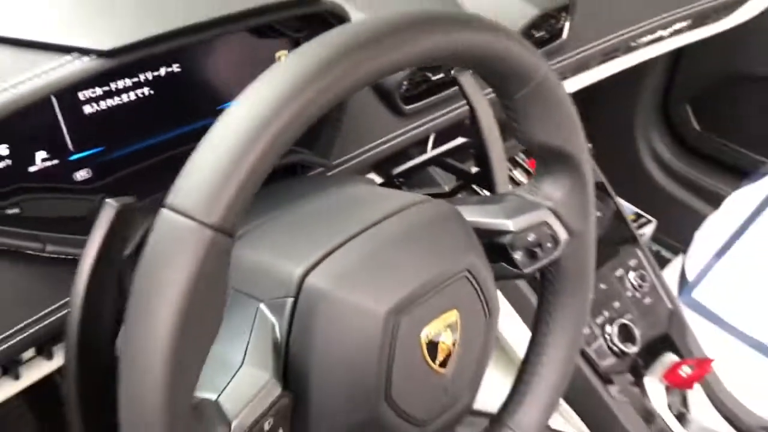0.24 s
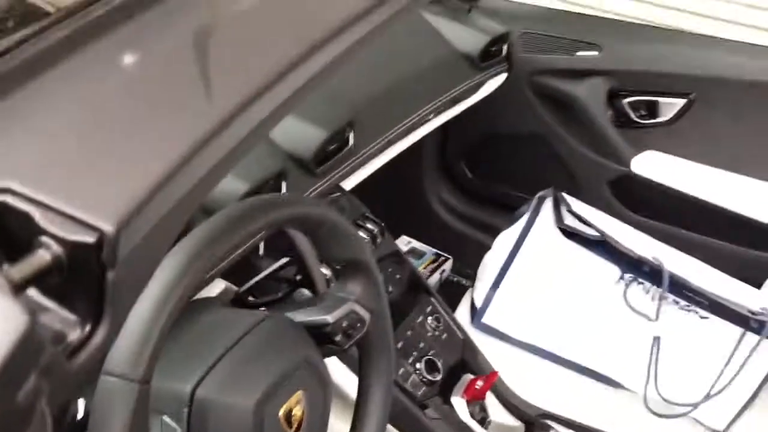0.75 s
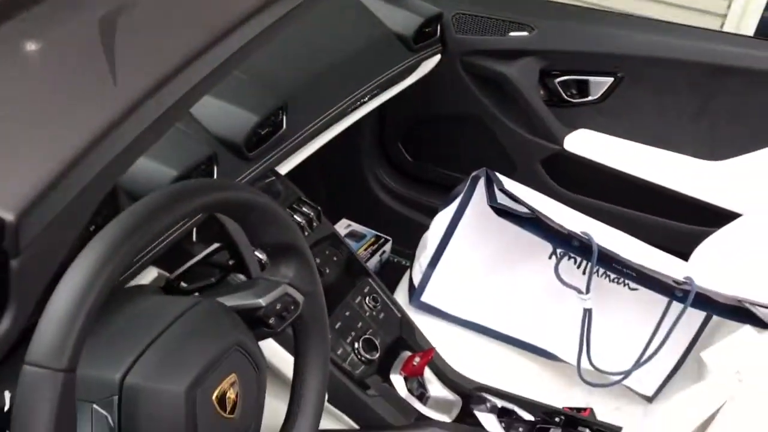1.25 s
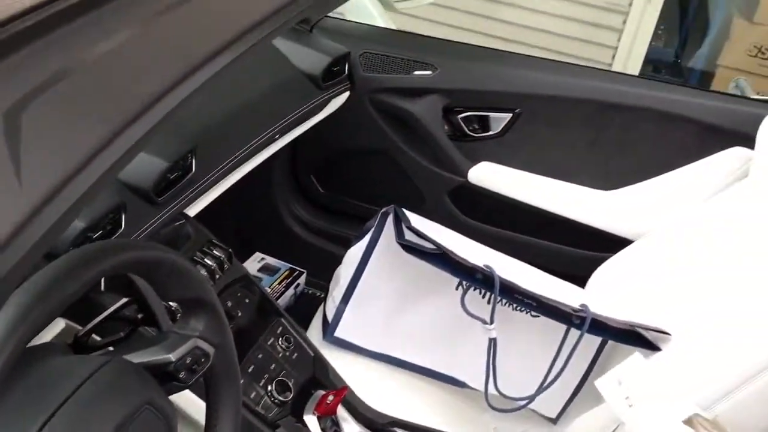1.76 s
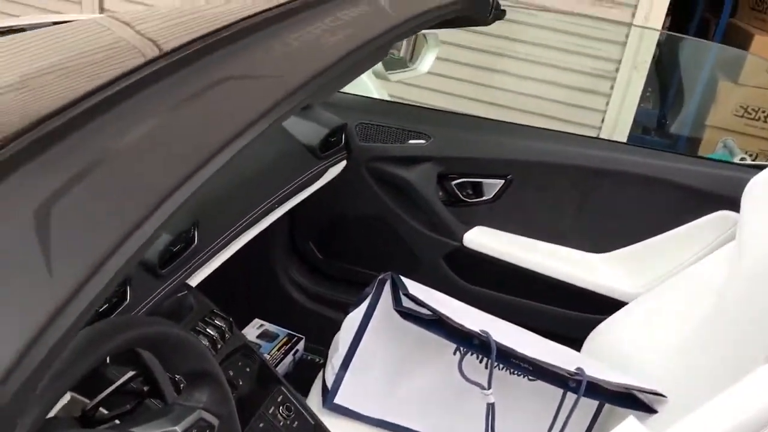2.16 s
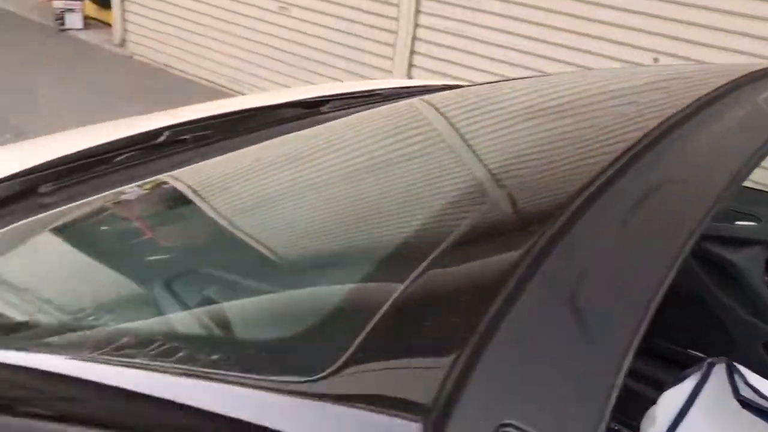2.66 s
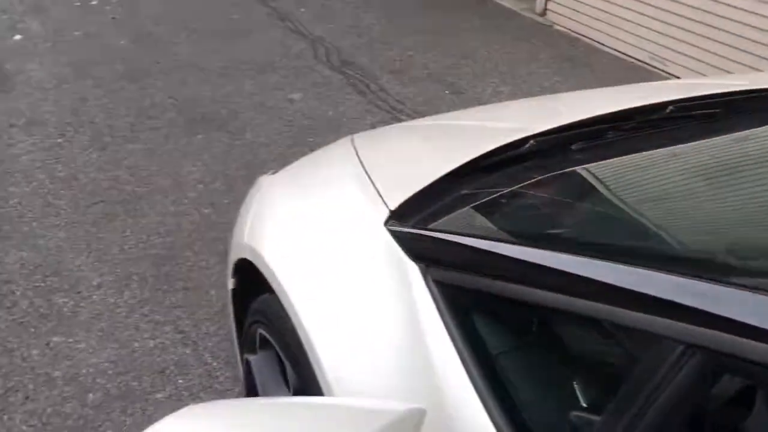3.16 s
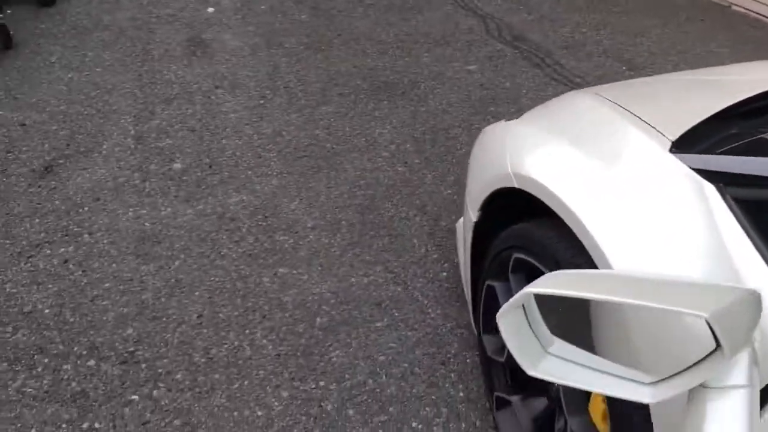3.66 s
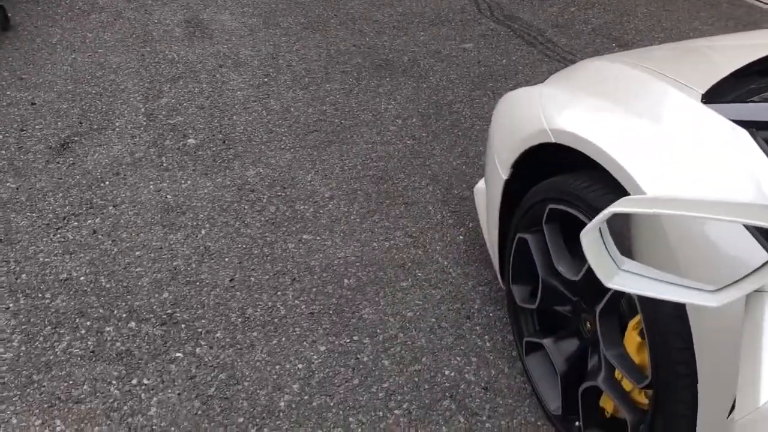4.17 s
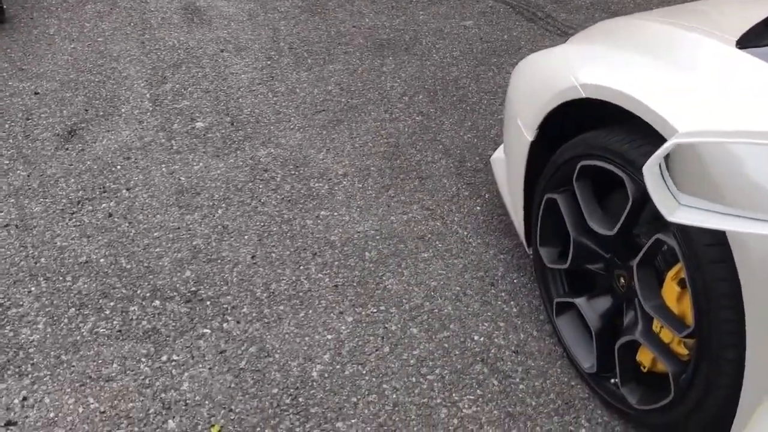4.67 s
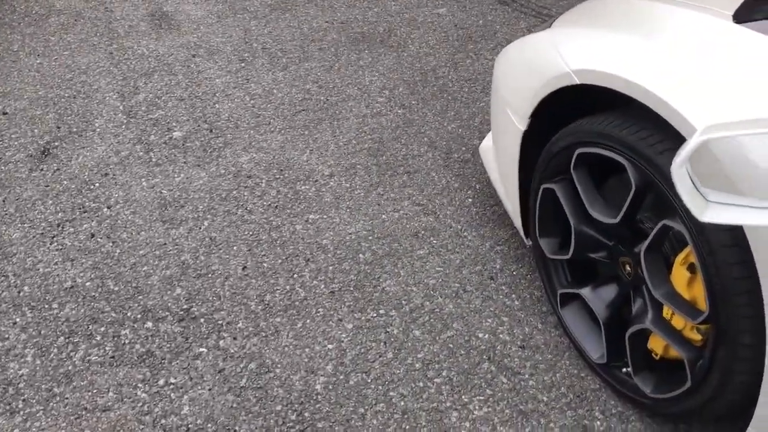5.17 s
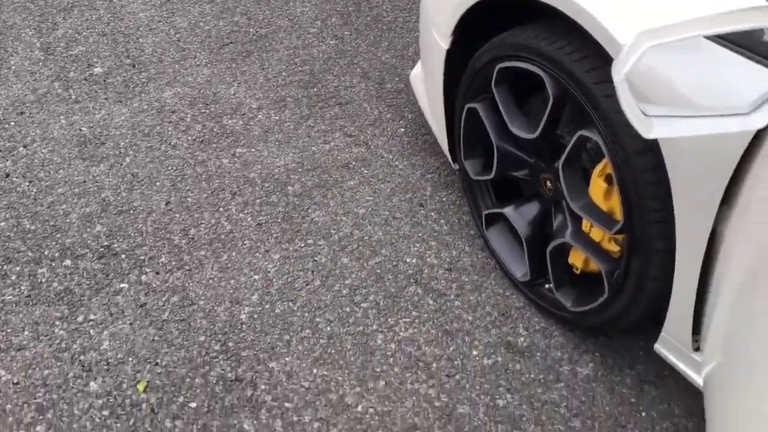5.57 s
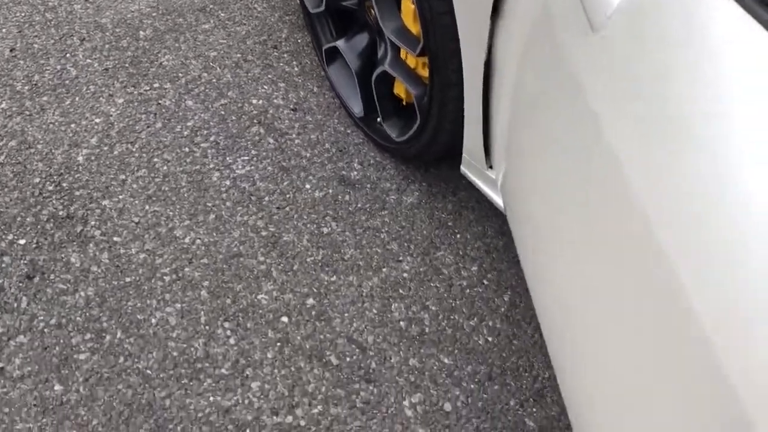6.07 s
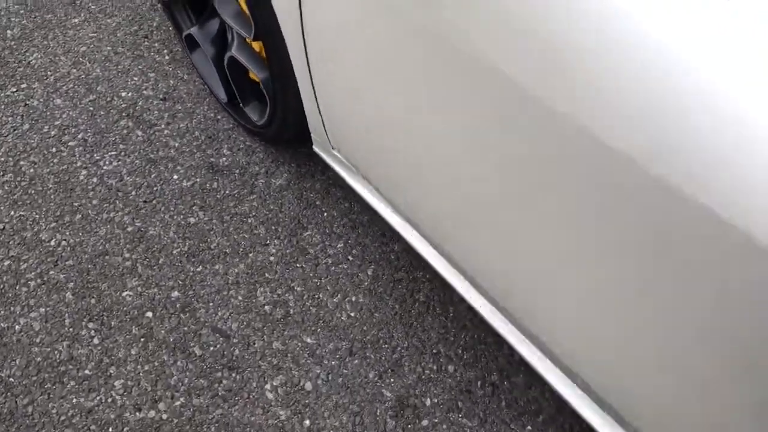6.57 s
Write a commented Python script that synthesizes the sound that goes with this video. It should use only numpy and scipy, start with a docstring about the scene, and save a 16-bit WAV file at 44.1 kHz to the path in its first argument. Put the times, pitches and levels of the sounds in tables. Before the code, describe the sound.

A sports car idles with a low steady rumble and fan rush, faint bumps, ticks and soft footfalls, then a car door thumps shut loudly.

```python
"""A sports car engine idles, its exhaust tones and uneven puffs rumbling under noise shaped like rushing fans.
Someone climbs out through the open door: a soft bump, ticks, rubs and footfalls made of grainy noise.
The door then swings shut: its contacts crunch and ring the steel, and shoves on the cabin air make it boom.
The listening place moves from the cabin through the doorway to the outside."""
import sys
import numpy as np
from scipy import signal
from scipy.fft import rfft, irfft
from scipy.io import wavfile

SR = 44100
rng = np.random.default_rng(int(sys.argv[2]) if len(sys.argv) > 2 else 0)


def to_wav(s):
    """Save 16-bit WAV."""
    ch = np.atleast_2d(s).T  # columns
    pcm = np.round(np.clip(ch, -1, 1) * 32767)  # PCM
    wavfile.write(sys.argv[1], SR, pcm.astype(np.int16))


N = 300740
TIME = np.arange(N) / SR   # seconds
CUTOFF_HZ = 15800

# where the listener is, 0 deep in the cabin, 1 in the doorway, 2 outside: (time [s], place [0 to 2])
# places beyond 2 count as outside for the levels
LISTENER_PLACE = [(0.2, 0), (1.0, 0.43), (2.1, 0.83), (2.8, 0.83), (3.6, 1.33), (4.4, 2.06), (6.82, 1.93)]
# average crankshaft speed: (time [s], turns per second [Hz])
CRANK_SPEED = [(0, 15.93), (3.7, 16.3), (6.82, 16.05)]
# engine and exhaust tones, average levels:
# (multiple of crank speed [-], in the cabin [dB], in the doorway [dB], outside [dB])
EXHAUST_TONES = [(2.85, -51, -58, -50), (3.75, -72, -60, -46.5), (4.1, -57.5, -46, -57),
                 (5.3, -61, -56.5, -52), (6, -55.5, -53.5, -60), (7.45, -65, -56, -52),
                 (8.15, -60, -51, -56), (11, -58, -54, -50), (12, -48, -48.5, -51.5), (13, -58, -64, -56.5),
                 (14, -66, -54.5, -51), (15, -58, -54.5, -53.5)]
# rumble and average fan levels: (in the cabin [dB], in the doorway [dB], outside [dB])
RUMBLE_LEVELS = (-46, -42, -44)
FAN_LEVELS = (-47, -43.5, -44.5)
# levels of the deep boom and the high hiss over time: (time [s], level [dB])
BOOM_LEVEL_CURVE = [(0.25, -58), (0.6, -51), (1.25, -58), (1.47, -51), (1.7, -65), (2.1, -41.5),
                    (2.55, -51), (3.0, -48), (3.4, -56), (3.8, -43), (4.15, -62), (4.6, -47), (5.1, -43.5),
                    (5.42, -37.5), (5.7, -51), (6.15, -40), (6.4, -53), (6.7, -43.5)]
HISS_LEVEL_CURVE = [(0.25, -69), (0.65, -63.5), (1.2, -67), (1.75, -63.5), (2.3, -67.5), (3.05, -63),
                    (3.55, -64), (4.1, -65), (4.9, -63.5), (5.7, -65.5), (6.7, -66.5)]
# balance of low and high in each steady noise: (frequency [Hz], relative level [dB])
BOOM_COLOUR = [(20, -25), (30, -16), (38, 10), (46, -13), (64, 13), (80, -13), (110, -28)]
RUMBLE_COLOUR = [(65, -35), (90, -1.5), (130, 1.5), (180, 2), (250, 1), (310, -0.5), (390, -7), (520, -19)]
FAN_COLOUR = [(330, -6), (400, -4.5), (520, -2.5), (700, -1.5), (920, 2), (1250, -3), (2000, -12),
              (2500, -15), (3050, -20), (4400, -24.5), (5000, -28.5), (7500, -32.5), (10500, -33.5)]
CABIN_HISS_COLOUR = [(5500, 1), (7000, -4), (8600, 0.5), (9800, -5), (11000, 1.5), (13000, 1), (15200, 4),
                     (16000, -7)]
OPEN_AIR_HISS_COLOUR = [(6000, -9), (8000, -10), (10500, -9), (11500, 1.5), (13000, 3.5), (16000, -2)]

# soft bump on the cabin trim: (time [s], strength [dB])
TRIM_BUMPS = [(0.0278, -33.5), (0.037, -34.5), (0.056, -37), (0.095, -35)]
# how the trim rings: (frequency [Hz], level [dB], time to fall 60 dB [s])
TRIM_RINGS = [(98.4, -7.5, 0.28), (175, 1, 0.17), (245.4, 3.5, 0.23), (299.5, -1, 0.33), (336, 2, 0.11),
              (614, -6.5, 0.08)]
# rubs of clothes and shoes: (time [s], level [dB], centre [Hz], time to fall 60 dB [s])
CLOTH_AND_SHOE_RUBS = [(0.04, -38, 980, 0.35), (0.12, -57, 7000, 0.53), (0.2, -49, 2470, 0.39),
                       (0.87, -53.5, 5000, 0.53), (1.576, -37, 3000, 0.086), (3.061, -46, 3000, 0.13),
                       (3.769, -39, 1780, 0.12), (2.905, -44, 2640, 0.14), (4.94, -47, 6000, 0.07),
                       (6.08, -42, 2013, 0.08)]
RUB_OCTAVES, RUB_RISE_SHARE = 1.17, 0.092   # the rise time is this share of the fall time
# ticks of trim and grit: (time [s], knock level [dB], knock centre [Hz], snap level [dB])
TRIM_AND_GRIT_TICKS = [(0.678, -56, 8000, -51), (0.696, -55, 7500, -52), (1.578, -45, 3370, -43),
                       (1.614, -46, 3000, -51), (1.883, -57, 8000, -46), (1.89, -43, 2200, -48),
                       (1.957, -40, 1900, -50), (1.971, -42, 2000, -46), (2.859, -40, 2230, -46),
                       (2.9003, -35, 1800, -38), (2.913, -45, 14000, -44), (2.932, -43, 2200, -50),
                       (2.949, -52, 14000, -53), (3.023, -43.5, 2500, -48), (3.773, -40, 2070, -56),
                       (4.922, -31, 1300, -49), (4.936, -41, 1870, -44), (6.14, -42, 2310, -44),
                       (6.367, -55, 4800, -62)]
KNOCK_OCTAVES, KNOCK_T60_S = 0.68, 0.038
SNAP_HZ, SNAP_OCTAVES, SNAP_T60_S = 5640, 1.8, 0.028
TICK_RISE_S = 0.0005
# soft footfalls and shifts of weight: (time [s], level [dB])
SOFT_FOOTFALLS = [(1.426, -34), (3.099, -34.5), (5.23, -30), (5.4, -30), (6.11, -30)]
# a thin ping and a low hum: (time [s], level [dB], centre [Hz], time to fall 60 dB [s])
PING_AND_HUM = [(1.579, -45, 3460, 0.1), (3.17, -32.5, 300, 0.72)]
TONE_OCTAVES = 0.061

# door contacts (seal, striker, latch, stop, rattles): (time [s], crunch level [dB], centre [Hz],
# width [octaves], time to fall 60 dB [s], blow to the shell [dB])
DOOR_CONTACTS = [(6.7445, -14, 1500, 1.15, 0.028, -21.5), (6.748, -15, 1200, 1.63, 0.11, -8),
                 (6.7509, -20, 2000, 1.45, 0.041, -10), (6.7627, -12, 1600, 1.8, 0.029, -22),
                 (6.7628, -17, 12200, 0.51, 0.028, -30), (6.7786, -16, 1220, 1.4, 0.058, -28),
                 (6.79, -23, 1600, 0.44, 0.042, -22), (6.8135, -34, 2500, 1.7, 0.088, -33)]
# how the door shell rings: (frequency [Hz], level [dB], time to fall 60 dB [s])
SHELL_RINGS = [(159.3, -3, 0.17), (235, -6, 0.15), (300.7, -15, 0.5), (474, -18, 0.18), (650, -24, 0.017),
               (714, 4.5, 0.017), (977, -13, 0.073), (1130, -17, 0.046), (1250, -6.5, 0.066),
               (1397, -8.5, 0.05), (1660, -28, 0.04), (1786, -21, 0.13), (1980, -14, 0.04),
               (2550, -17.5, 0.076), (2720, -17, 0.093)]
# one hard crack as the door hits its stop: (time [s], strength [dB])
STOP_CRACK = (6.7794, -1)
# brief ring of the steel at the stop: (frequency [Hz], level [dB], time to fall 60 dB [s])
STOP_RINGS = [(1070, -13, 0.0053), (2710, -4.5, 0.0016), (3850, -8.5, 0.0028)]
# shoves of the door on the cabin air: (time [s], strength [dB], length [s])
AIR_SHOVES = [(6.758, -13.5, 0.0035), (6.7738, -9.5, 0.0025), (6.787, -5, 0.0065)]
# how cabin air and body boom: (frequency [Hz], level [dB], time to fall 60 dB [s])
CABIN_RINGS = [(60.5, 5, 0.083), (97, -0.5, 0.25), (138, -2.5, 0.041)]

# echoes from the ground, car side and shutter: (delay [s], level [dB])
NEARBY_ECHOES = [(0.01, -14), (0.019, -14), (0.031, -15.5)]
ECHO_CUT_HZ = 8600   # echoes come back duller
# dips in the microphone's response: (centre [Hz], width [Hz])
MICROPHONE_DIPS = [(7650, 520), (10350, 770)]
MIC_DIP_SHARE = 0.37   # share of the sound taken out at each dip's centre


def from_db(db):
    """Turn decibels into a plain multiplier."""
    return 10 ** (np.asarray(db) / 20)


def rms_one(x):
    """Scale a sound so its average strength (rms) is 1."""
    return x / np.sqrt(np.mean(x ** 2) + 1e-20)


def curve(rows):
    """Join the points of a (time, value) table with straight lines, one value per sample."""
    times, values = np.transpose(rows)
    return np.interp(TIME, times, values)


def at_place(levels_db, place):
    """Blend the cabin, doorway and outside levels to suit the listener's place."""
    return np.interp(place, np.arange(len(levels_db)), levels_db)


def drift(rate_hz):
    """Random wandering with rms 1: noise smoothed twice, so a higher rate wanders faster."""
    step = 40   # samples between the points that are worked out
    warm_up = 2000   # points dropped while the smoothing settles
    r = np.exp(-2 * np.pi * rate_hz * step / SR)
    noise = rng.standard_normal(N // step + 2 + warm_up)
    slow = rms_one(signal.lfilter([1], [1, -2 * r, r * r], noise)[warm_up:])
    return np.interp(np.arange(N) / step, np.arange(len(slow)), slow)


def coloured(x, colour):
    """Shape a steady sound's balance of low and high, fading past both ends; rms 1."""
    hz, db = np.transpose(colour)
    f = np.maximum(np.fft.rfftfreq(N, 1 / SR), 1)
    skirts = np.minimum(1, f / hz[0]) ** 4 * np.minimum(1, hz[-1] / f) ** 4
    shape = from_db(np.interp(np.log(f), np.log(hz), db))
    return rms_one(irfft(rfft(x) * shape * skirts, N))


def ring(force, modes):
    """A push sets each natural pitch swinging and dying away; neighbours swing opposite ways."""
    out = np.zeros(N)
    for k, (hz, db, t60) in enumerate(modes):
        r = from_db(-60 / (t60 * SR))   # loss per sample
        w = 2 * np.pi * hz / SR
        swing = signal.lfilter([0, np.sin(w)], [1, -2 * r * np.cos(w), r * r], force + 1e-18)
        out += (-1) ** k * from_db(db) * swing
    return out


def add(track, s, sound):
    """Mix a short sound into a track at a time in seconds."""
    at = min(int(s * SR), N - 1)
    track[at:at + len(sound)] += sound[:N - at]


def crunch(hz, octaves, t60, grain_db, rise_s):
    """Many tiny slips in one contact: up to half a second of grainy noise that rises and dies away."""
    t = TIME[:SR // 2]
    f = np.maximum(np.fft.rfftfreq(len(t), 1 / SR), 1)
    grain = from_db(grain_db * rng.standard_normal(len(t)))   # uneven slip sizes
    slips = rng.standard_normal(len(t)) * grain
    hump = 1 / (1 + (np.log2(f / hz) / octaves) ** 2) ** 2   # loudest at the centre pitch
    noise = rms_one(irfft(rfft(slips) * hump * (f < CUTOFF_HZ), len(t)))
    return noise * (1 - np.exp(-t / rise_s)) * from_db(-60 * t / t60)


def exhaust_tones(turns, place):
    """Pitches that follow the crank, each wavering in level by chance."""
    tones = np.zeros(N)
    for multiple, *levels_db in EXHAUST_TONES:
        level = from_db(at_place(levels_db, place) + 2.35 * drift(5.4))
        tones += np.sqrt(2) * level * np.sin(2 * np.pi * (multiple * turns + rng.random()))
    return tones


def hiss(place):
    """High air noise whose colour changes as the listener passes the doorway."""
    air = rng.standard_normal(N)
    in_the_open = np.clip((place - 0.9) / 0.34, 0, 1)
    inside = (1 - in_the_open) * coloured(air, CABIN_HISS_COLOUR)
    outside = in_the_open * coloured(air, OPEN_AIR_HISS_COLOUR)
    return from_db(curve(HISS_LEVEL_CURVE)) * (inside + outside)


def idle():
    """Crank tones and uneven exhaust puffs below, the rush of fans and intake above."""
    place = curve(LISTENER_PLACE)
    speed = curve(CRANK_SPEED) * (1 + 0.00371 * drift(2.19))   # slightly unsteady
    turns = np.cumsum(speed) / SR
    firing = np.cos(2 * np.pi * 5 * turns)   # ten cylinders: five puffs a turn
    lope = np.cos(2 * np.pi * 2 * turns)   # the two banks fire unevenly
    puffs = from_db(2.5 * firing + 0.63 * lope)
    boom = from_db(curve(BOOM_LEVEL_CURVE)) * coloured(rng.standard_normal(N), BOOM_COLOUR)
    rumble = coloured(puffs * rng.standard_normal(N), RUMBLE_COLOUR)
    rumble *= from_db(at_place(RUMBLE_LEVELS, place))
    fan_db = at_place(FAN_LEVELS, place) + 0.3 * firing + 0.5 * drift(37)
    fan = from_db(fan_db) * coloured(rng.standard_normal(N), FAN_COLOUR)
    return exhaust_tones(turns, place) + boom + rumble + fan + hiss(place)


def trim_bump():
    """A few close pushes make the cabin trim ring dully."""
    force = np.zeros(N)
    for s, db in TRIM_BUMPS:
        add(force, s, from_db([db]))
    return ring(force, TRIM_RINGS)


def rubs():
    """Clothes and shoes drag in many tiny slips, swelling and fading."""
    out = np.zeros(N)
    for s, db, hz, t60 in CLOTH_AND_SHOE_RUBS:
        rub = crunch(hz, RUB_OCTAVES, t60, grain_db=7.0, rise_s=RUB_RISE_SHARE * t60)
        add(out, s, from_db(db) * rub)
    return out


def ticks():
    """Trim and grit tick: each is a knock together with a wider band of noise, the snap."""
    out = np.zeros(N)
    for s, knock_db, hz, snap_db in TRIM_AND_GRIT_TICKS:
        knock = crunch(hz, KNOCK_OCTAVES, KNOCK_T60_S, grain_db=4.0, rise_s=TICK_RISE_S)
        snap = crunch(SNAP_HZ, SNAP_OCTAVES, SNAP_T60_S, grain_db=6.0, rise_s=TICK_RISE_S)
        add(out, s, from_db(knock_db) * knock + from_db(snap_db) * snap)
    return out


def footfalls():
    """Feet and shifting weight give soft, low thuds of noise."""
    out = np.zeros(N)
    for s, db in SOFT_FOOTFALLS:
        thud = crunch(hz=66, octaves=0.93, t60=0.38, grain_db=2.0, rise_s=0.021)
        add(out, s, from_db(db) * thud)
    return out


def ping_and_hum():
    """Very narrow bands of noise sound almost like notes: a thin ping, then a low hum."""
    out = np.zeros(N)
    for s, db, hz, t60 in PING_AND_HUM:
        tone = crunch(hz, TONE_OCTAVES, t60, grain_db=0, rise_s=RUB_RISE_SHARE * t60)
        add(out, s, from_db(db) * tone)
    return out


def climbing_out():
    """The small sounds of the person and trim, added together."""
    return trim_bump() + rubs() + ticks() + footfalls() + ping_and_hum()


def yard(x):
    """Nearby surfaces return a few early echoes with less treble."""
    out = x.copy()
    low_pass = signal.butter(1, ECHO_CUT_HZ, fs=SR, output="sos")
    dull = signal.sosfilt(low_pass, x + 1e-18)
    for delay, db in NEARBY_ECHOES:
        add(out, delay, from_db(db) * dull)
    return out


def door_contacts():
    """Each contact crunches and strikes the door shell, which rings."""
    contacts, blows = np.zeros((2, N))
    for s, db, hz, octaves, t60, blow_db in DOOR_CONTACTS:
        add(contacts, s, from_db(db) * crunch(hz, octaves, t60, grain_db=5.5, rise_s=0.00083))
        add(blows, s, from_db([blow_db]))
    return contacts + ring(blows, SHELL_RINGS)


def cabin_boom():
    """Slower shoves of the door panel set the cabin air and body booming."""
    pressure = np.zeros(N)
    for s, db, length in AIR_SHOVES:
        push = np.hanning(int(length * SR))
        add(pressure, s, from_db(db) * push / push.sum())
    boom = sum(ring(pressure, [mode]) for mode in CABIN_RINGS)   # all pushed the same way
    leak_hz = 35   # the open cabin holds no slow pressure
    return signal.sosfilt(signal.butter(2, leak_hz, "high", fs=SR, output="sos"), boom)


def stop_crack():
    """The door hits its stop once and the steel rings very briefly."""
    crack = np.zeros(N)
    stop_s, stop_db = STOP_CRACK
    add(crack, stop_s, from_db([stop_db]))
    return ring(crack, STOP_RINGS)


def door():
    """The door shuts with echoing contacts, a cabin boom and a hard crack."""
    return yard(door_contacts()) + cabin_boom() + stop_crack()


def scene():
    """Everything at one microphone."""
    return (idle() + yard(climbing_out()) + door())[None]


def record(dry):
    """The microphone dips twice in the treble; peaks are rounded and the top is cut."""
    for hz, width_hz in MICROPHONE_DIPS:
        notched = signal.lfilter(*signal.iirnotch(hz, hz / width_hz, fs=SR), dry)
        dry = dry + MIC_DIP_SHARE * (notched - dry)
    top = 1.2   # the rounding never lets a peak pass this
    rounded = top * np.tanh(dry / top)
    steep = signal.ellip(10, 0.1, 80, CUTOFF_HZ, fs=SR, output="sos")
    return signal.sosfilt(steep, rounded)


dry = scene()
out = record(dry)
to_wav(out)
```